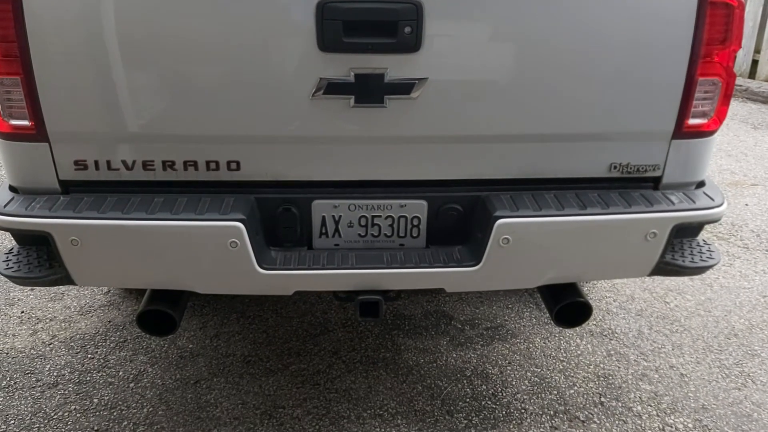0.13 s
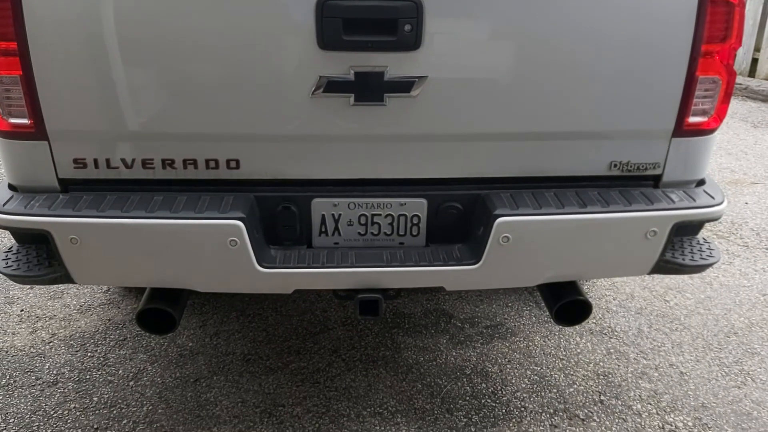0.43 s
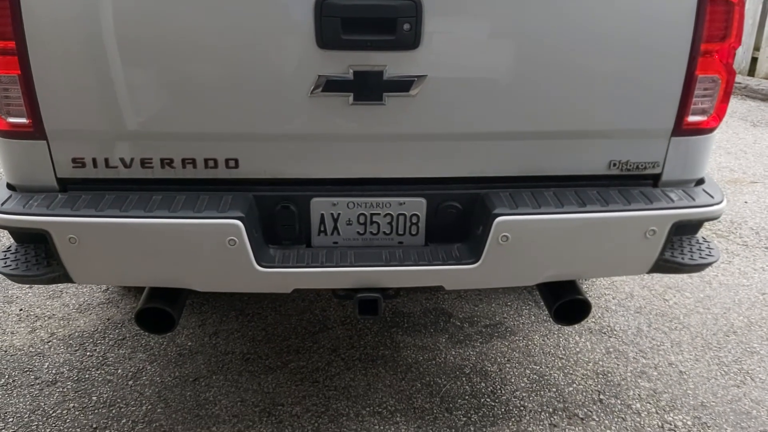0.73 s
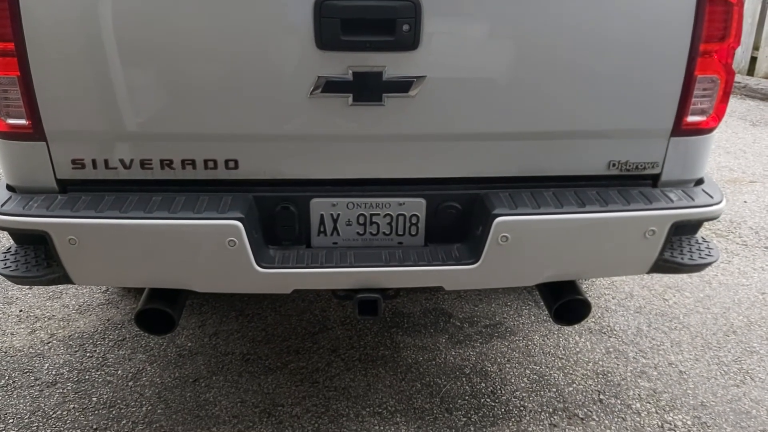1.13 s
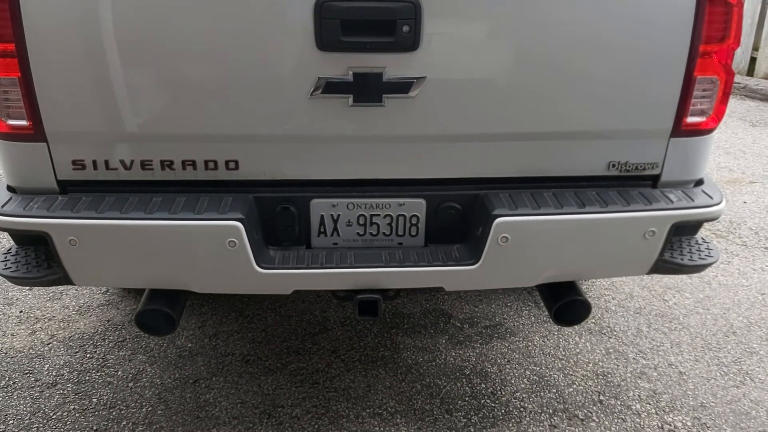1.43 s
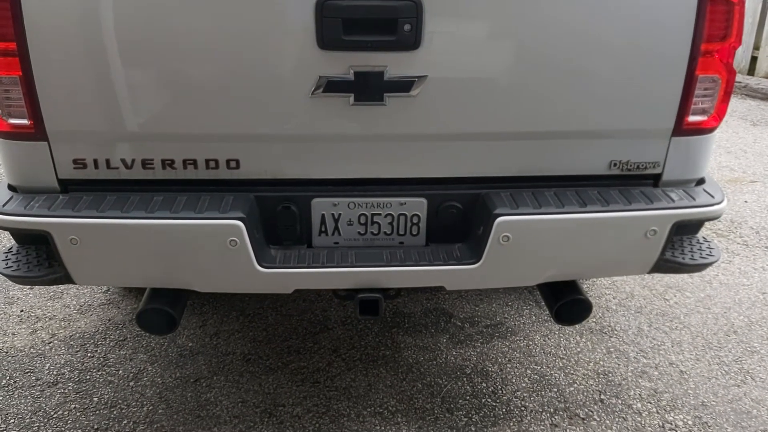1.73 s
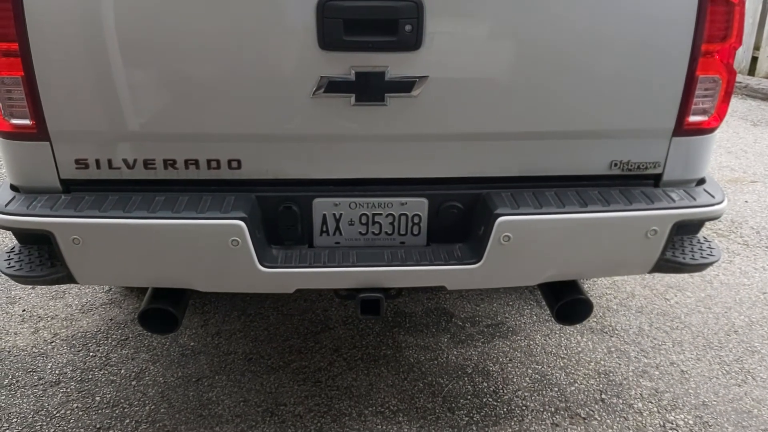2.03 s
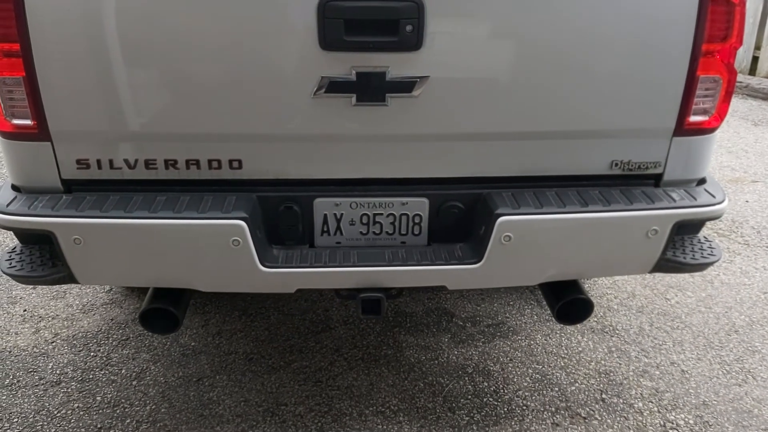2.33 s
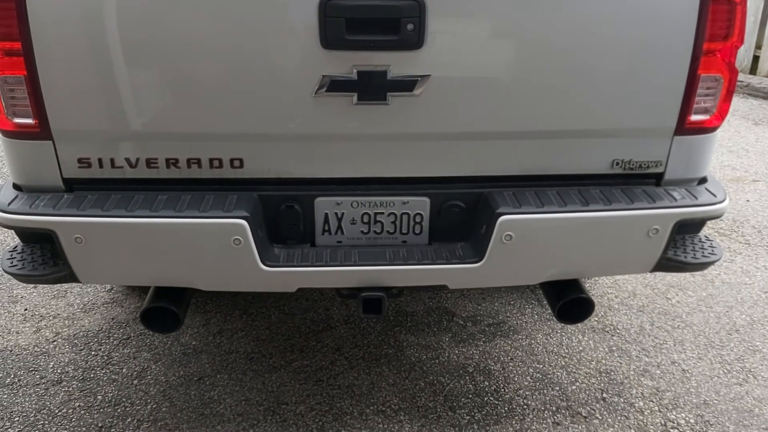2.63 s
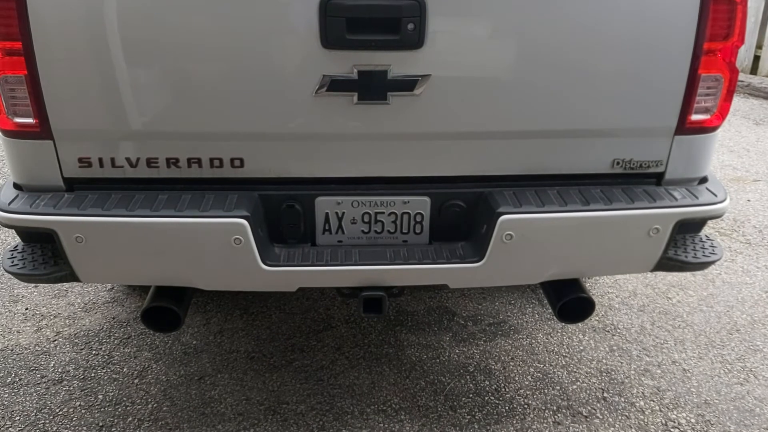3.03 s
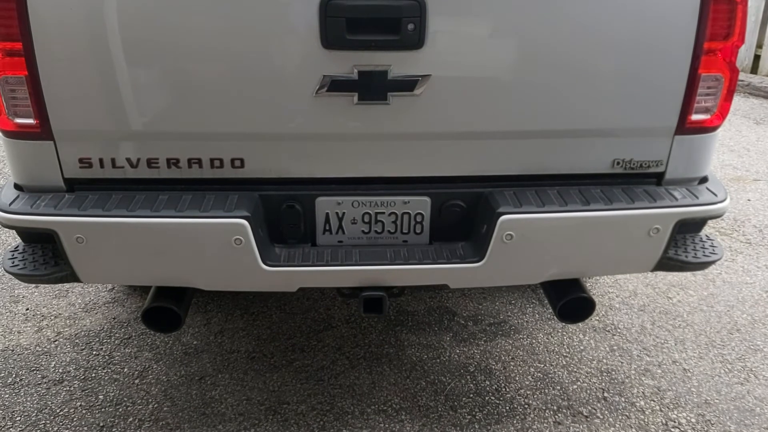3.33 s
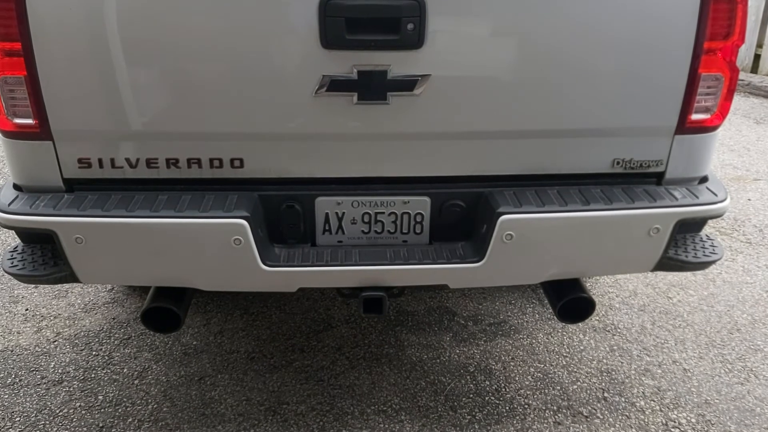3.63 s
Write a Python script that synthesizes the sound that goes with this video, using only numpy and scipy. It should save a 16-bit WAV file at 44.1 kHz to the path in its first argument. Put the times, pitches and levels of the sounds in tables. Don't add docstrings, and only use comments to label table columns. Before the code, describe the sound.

A V8 truck engine starts immediately: ragged thumping pops and bright cracks over 0-0.2 s, then a loud, booming exhaust flare peaking around 0.2-0.3 s. It drops away by 0.8 s, slowing into a much quieter, low burbling idle with soft rushing gas. Faint bird whistles come near 1.8-2 s and 3.2-3.5 s. The idle grows slightly fuller and lopes, with metallic tailpipe pings around 3.4-3.6 s and tiny dry rustles.

```python
import sys
import numpy as np
from scipy import signal
from scipy.fft import rfft, irfft, next_fast_len
from scipy.io import wavfile
from scipy.ndimage import uniform_filter1d

SR = 44100
rng = np.random.default_rng(int(sys.argv[2]) if len(sys.argv) > 2 else 0)


def invert_db(level):
    return 10 ** (np.asarray(level, dtype=float) / 20)


def output_pcm(signal):
    pcm = np.clip(np.atleast_2d(signal).T, -1, 1) * 32767
    wavfile.write(sys.argv[1], SR, np.round(pcm).astype(np.int16))


N = 166698

# f/Hz, width/Hz, level/dB
TAILPIPE_BANDS = [(390, 10, 5.5), (465, 68, 3.5), (668, 180, 8.5), (770, 37, 0.5), (1255, 190, 5),
                  (1466, 180, 0), (2092, 450, -4.5), (2640, 610, -13.5)]
BANKS = [1, -1, 1, -1, -1, 1, -1, 1]


def evened(x):
    return x / np.sqrt(np.mean(x ** 2) + 1e-20)


def read(points, hz):
    f, value = np.transpose(points)
    return np.interp(np.log(hz + 1), np.log(f + 1), value)


def ring(x, hz, width):
    r = np.exp(-np.pi * width / SR)
    return signal.lfilter([1 - r, 0, r - 1], [1, -2 * r * np.cos(2 * np.pi * hz / SR), r * r], x)


def clicks(times, sizes):
    return np.bincount(np.clip(np.round(times * SR).astype(int), 0, N - 1), sizes, N)


def decaying_tone(u, hz, width, rise_s):
    return np.minimum(u / rise_s, 1) * np.exp(-np.pi * width * u) * np.sin(2 * np.pi * hz * u)


def pops():
    # t/s, level/dB
    first_firings = [(.017, -9), (.029, -5), (.040, -6), (.053, -7), (.062, 0), (.070, -3), (.081, -6),
                     (.104, -1), (.120, -5), (.129, -3), (.140, -7), (.150, -8), (.162, -1), (.173, -4)]
    # f/Hz, width/Hz, level/dB
    pop_ring = [(70, 35, -1), (95, 35, 2), (125, 30, -4), (172, 35, -5), (255, 40, -3), (310, 30, -12)]
    soft_s = .002
    s, db = np.transpose(first_firings)
    train = clicks(s, -invert_db(db))
    thump = sum(invert_db(g) * ring(train, hz, w) / w for hz, w, g in pop_ring)
    thump = signal.fftconvolve(thump, np.hanning(round(2 * soft_s * SR)), "same")
    crack = sum(invert_db(g) * ring(train, hz, w) / np.sqrt(w) for hz, w, g in TAILPIPE_BANDS)

    def unit(v):
        return v / np.sqrt(np.mean(v[:SR // 5] ** 2))

    return invert_db(-8.5) * unit(thump) + invert_db(-38) * unit(crack), train


def raps(t):
    # t/s, level/dB, f/Hz
    cracks = [(0.017, -8, 680), (0.091, -9, 750), (0.118, -15.5, 584), (0.145, -4, 760), (0.21, -27.5, 587),
              (0.241, -13.5, 622), (0.281, -31, 650), (0.3, -30.5, 590), (0.321, -20, 623),
              (0.382, -16.5, 595), (0.401, -28, 627)]
    # multiple, level/dB
    crack_overtones = [(1, 0), (1.97, -1), (3.1, -9)]
    # t/s, level/dB, f/Hz
    upper_raps = [(0.2527, -27, 1280), (0.3036, -28, 1260), (0.411, -28.5, 1210), (0.4605, -33.5, 1460),
                  (0.644, -37, 1290), (0.679, -46, 1110), (0.6977, -46, 1280), (0.789, -36, 1160),
                  (2.4895, -42, 1200), (2.6193, -45, 1200), (2.7361, -31.5, 1260), (2.7897, -41, 1270),
                  (2.937, -34, 1270), (3.084, -31, 1270), (3.133, -41, 1290), (3.1798, -37, 1250),
                  (3.2565, -43, 1160), (3.404, -38, 1270), (3.4385, -18, 1280), (3.5258, -37, 1290),
                  (3.5574, -13, 1280), (3.6774, -39, 1290), (3.7248, -36, 1440), (3.7467, -34, 1290)]
    # t/s, level/dB, f/Hz
    pings = [(2.5875, -41, 2280), (2.6733, -43, 2110), (2.824, -48, 2030), (3.1397, -32.5, 2140),
             (3.1871, -26, 2050), (3.257, -38, 2030), (3.3737, -43, 2020), (3.4041, -29, 2090),
             (3.4964, -31, 2080), (3.7314, -35, 2050)]
    width_hz, rise_s, lean_db = 70, .002, -6
    rows = [(s, db - 4, hz) for table in (upper_raps, pings) for s, db, hz in table]
    rows += [(s, db - 3 + g, hz * m) for s, db, hz in cracks for m, g in crack_overtones]
    out = np.zeros(N)
    u = t[:SR // 20]
    for s, db, hz in rows:
        part = out[round(s * SR):][:len(u)]
        part += (invert_db(db) * decaying_tone(u, hz, width_hz, rise_s))[:len(part)]
    return np.array([out * invert_db(lean_db / 2), np.roll(out, 10) * invert_db(-lean_db / 2)])


def rush(shape, gate):
    # f/Hz, share
    likeness = [(300, 0.58), (640, 0.46), (1400, 0.42), (3100, 0.1), (6800, 0.14), (15000, 0.14)]
    # f/Hz, level/dB
    left_lean = [(380, 5.5), (700, -3.5), (1300, -6), (2400, -5), (4400, -3), (8000, -3.5), (15000, 3.5)]
    # f/Hz, phase/rad
    left_lead = [(20, 0), (520, .2), (780, -1), (1460, 1.3), (2070, -.2), (2400, .3), (15000, .3)]
    size = next_fast_len(N)
    hz = np.fft.rfftfreq(size, 1 / SR)
    a, b = rfft(rng.standard_normal((2, N)) * gate, size)
    same = np.clip(read(likeness, hz), 0, 1)
    lean = invert_db(read(left_lean, hz) / 2)
    shared = same * a * np.exp(-1j * read(left_lead, hz))
    right = (shared + np.sqrt(1 - same ** 2) * b) / lean
    return evened(irfft(np.array([a * lean, right]) * shape(hz), size)[:, :N])


def curve(points):
    return lambda hz: invert_db(read(points, hz))


def bands(modes):
    def shape(hz):
        return np.sqrt(sum(invert_db(g) ** 2 / (1 + (2 * (hz - f) / w) ** 2) ** 2 for f, w, g in modes))
    return shape


def gas(t, firings, gas_db):
    # f/Hz, level/dB per Hz
    under = [(180, -34), (300, 2), (464, -37), (540, -16.5), (700, -19.5), (1010, -30.5), (1280, -30),
             (5000, -59.5), (6500, -74), (11000, -120)]
    # f/Hz, level/dB per Hz
    hiss = [(1760, -42), (3000, 4.5), (3810, 1.5), (4410, 3), (5490, -4), (6340, 0), (6880, -12),
            (11300, -14.5), (15500, -17)]
    # f/Hz, level/dB per Hz
    blast_colour = [(530, -43), (900, -28), (1330, -8.5), (1790, -16.5), (2120, -13), (3330, -27),
                    (6040, -18.5), (7400, -32), (15500, -36)]
    # f/Hz, width/Hz, level/dB
    roar_bands = [(714, 240, 6), (1404, 87, 5), (1670, 140, -2.5), (2060, 1100, -14.5), (2760, 350, -11.5)]
    puff_s, floor = 0.0036, 4.2
    gate = floor + evened(signal.lfilter([1], [1, -np.exp(-1 / (puff_s * SR))], firings))
    steady = rush(bands(TAILPIPE_BANDS), gate)
    steady += invert_db(8.5) * rush(curve(under), gate)
    steady += invert_db(-16.5) * rush(curve(hiss), 9 + gate)
    blast = invert_db(-23.5 - 91 * t - 653 * np.maximum(t - 0.19, 0)) + invert_db(-63 - 39.5 * t)
    bright = blast * rush(curve(blast_colour), 11 + gate)
    roar = invert_db(-21 - 25.5 * t - 220 * np.maximum(t - .7, 0)) * np.minimum(t / 0.057, 1)
    return invert_db(gas_db) * steady + bright + roar * rush(bands(roar_bands), gate - 0.87 * floor)


def pipe(column, side):
    # f/Hz, width/Hz, both banks together/dB, their difference/dB, left-right/dB
    modes = [(44, 7, -45, -24, -3.5), (77, 9, -45, -23, .3), (105, 40, -45, -23, -.5),
             (137, 14, -22, -27, -2.5), (173, 13, -23, -19.5, -2.5), (222, 20, -44, -36, -1),
             (254, 18, -30, -23, -2), (275, 12, -32, -33, -1), (300, 14, -37, -37, 1),
             (334, 14, -44, -41, -1), (388, 14, -44, -38, -2), (458, 14, -48, -43, -3),
             (612, 30, -52, -50, -3), (710, 40, -54, -52, -3)]
    hz = np.fft.rfftfreq(2 ** 15, 1 / SR)
    power = 0
    for row in modes:
        gain = invert_db(row[column] + side * row[4] / 2)
        power = power + gain ** 2 / (1 + (2 * (hz - row[0]) / row[1]) ** 2) ** 2
    ceps = irfft(np.log(power + 1e-12) / 2)
    half = len(ceps) // 2
    ceps[1:half] *= 2
    ceps[half + 1:] = 0
    return irfft(np.exp(rfft(ceps)))[:half]


def firing_boom(turns, boom_db, wobble):
    # multiple, level/dB, lag/turns
    harmonics = [(1, 2, 0.14), (2, -4.5, 0.086), (3, -5, 0.15)]
    hum = 0
    for m, db, lag in harmonics:
        gain = invert_db(db + (m > 1) * (boom_db + 4.5))
        hum = hum + gain * np.cos(2 * np.pi * (m * turns - lag))
    boom = -np.sqrt(2) * invert_db(boom_db) * wobble * hum
    return boom + [[.12], [-.12]] * np.roll(boom, 110)


def exhaust(t, turns, boom_db, pulse_db, upper_db):
    k = np.arange(1, int(turns[-1]))
    luck = rng.standard_normal((400, 3))[:len(k)]
    s = np.interp(k, turns, t)
    uneven = .12 + .88 * np.clip((s - 1.95) / .4, 0, 1)
    place = k + 3
    angle = 2 * np.pi * (place / len(BANKS) + 0.31)
    pair = (-1.) ** k
    s = s + .00012 * luck[:, 0] + uneven * (.0003 * np.sin(angle) + .0007 * pair)
    odd = np.take(BANKS, place % len(BANKS)) + uneven * (0.043 * np.cos(angle) + .42 * pair)
    odd = odd + (1.3 - uneven) * .45 * np.sin(2 * angle) + .18 * luck[:, 1]

    trains = {2: clicks(s, -np.ones(len(k))), 3: clicks(s, -odd)}
    out = np.array([sum(signal.fftconvolve(v, pipe(c, side))[:N] for c, v in trains.items())
                    for side in (1, -1)])
    low = signal.sosfiltfilt(signal.butter(4, 215, fs=SR, output="sos"), out)
    out = low + invert_db(upper_db) * (out - low)
    level = np.sqrt(np.mean(pipe(3, 0.98) ** 2) * 2 ** 14 * 140 / SR)

    boom = firing_boom(turns, boom_db, 1 + .06 * np.interp(turns, k, luck[:, 2]))
    caught = np.clip((t - 0.12) / 0.26, 0, 1)
    puff_size = invert_db(4 * luck[:, 2]) * (1 + uneven * np.cos(angle + 2 * np.pi * 0.36))
    return caught * (invert_db(pulse_db) * out / level + boom), clicks(s, puff_size) * (caught > 0)


def headers(t, turns, pulse_db):
    # place/firings into the cycle, f/Hz, width/Hz, level/dB
    header_rings = [(4.1, 457, 15, 1), (4.6, 386, 12, -3), (6.1, 328, 18, -2), (3.8, 610, 26, -5),
                    (1.3, 605, 20, -11), (6.1, 715, 36, -5)]
    cycle = np.arange(1, int(turns[-1] / len(BANKS)) + 1)
    luck = rng.standard_normal((60, len(header_rings)))
    out = np.zeros(N)
    u = t[:SR // 5]
    for (place, hz, width, db), chance in zip(header_rings, luck.T):
        at = len(BANKS) * cycle + place
        sizes = invert_db(db + 1.2 * chance[cycle]) * (at < turns[-1])
        train = clicks(np.interp(at, turns, t), sizes)
        out += signal.fftconvolve(train, decaying_tone(u, hz, width, .01))[:N]
    settled = np.clip((t - 1.75) / .3, 0, 1)
    return out * invert_db(pulse_db - 11 + 6 * settled) * invert_db(np.array([[-1.2], [1.2]]))


def bird(t):
    # t/s, length/s, from f/Hz, to f/Hz, level/dB
    whistles = [(1.78, .015, 5000, 5500, -58.5), (1.799, .02, 4980, 5200, -60),
                (1.8, .015, 4160, 4150, -48), (1.819, .07, 5350, 5800, -64.5),
                (1.881, .012, 4160, 4700, -51), (1.887, .012, 5410, 5000, -58.5),
                (1.899, .012, 4660, 4150, -45.5), (1.956, .016, 4070, 5200, -51.5),
                (1.971, .016, 5900, 6200, -54.5), (1.978, .012, 5150, 5050, -57.5),
                (3.24, .05, 4030, 4500, -62.5), (3.525, .025, 3460, 3420, -52),
                (1.9, .06, 5530, 6200, -60.5), (3.277, .085, 4520, 6200, -54),
                (3.34, .025, 4200, 4500, -48.5)]
    out = np.zeros(N)
    for start, length, from_hz, to_hz, db in whistles:
        u = np.clip((t - start) / length, 0, 1)
        swell = np.sqrt(np.sin(np.pi * u).clip(0))
        phase = 2 * np.pi * np.cumsum(from_hz + (to_hz - from_hz) * u) / SR
        out += invert_db(db) * swell * np.sin(phase)
    out *= invert_db(-4) + .45 * evened(uniform_filter1d(rng.standard_normal(N), 90))
    yard = rng.standard_normal(SR // 4) * invert_db(-60 * t[:SR // 4] / .16)
    return out + invert_db(2) * signal.fftconvolve(out, yard / np.linalg.norm(yard))[:N]


def rustle(t):
    # t/s, length/s, level/dB
    swells = [
        (3.13, .1, -73),
        (3.158, .006, -63),
        (3.774, .012, -50),
    ]
    highpass = signal.butter(4, 6500, "high", fs=SR, output="sos")
    hiss = signal.sosfilt(highpass, rng.standard_normal(N))
    return hiss * sum(invert_db(db) * np.sin(np.pi * np.clip((t - s) / length, 0, 1))
                      for s, length, db in swells)


def metal_ticks(t):
    # t/s, f/Hz, level/dB
    ticks = [
        (3.235, 3900, -58),
    ]
    out = np.zeros(N)
    for s, hz, db in ticks:
        u = np.maximum(t - s, 0)
        tone = invert_db(db - 2500 * u) * (t > s) * np.sin(2 * np.pi * hz * u)
        out += tone * (1 + .6 * rng.standard_normal(N))
    return out


def off_to_the_side(x):
    return np.array([x * invert_db(-1.2) + .3 * np.roll(x, 310), np.roll(x, 25) * invert_db(1.3)])


def scene():
    # t/s, boom/dB, pulse level/dB, gas level/dB, upper pipe modes/dB
    course = [(0, 14, -16, -44.5, 0), (.02, 0.5, -18.5, -24.5, -14), (.2, -2.5, 4, -30.5, -8),
              (0.298, -8, -13.5, -36, 6.5), (.56, -10, -18.5, -38.5, -2), (.68, -11.5, -16, -41, -3.5),
              (.76, -23, -13, -39.5, -3.5), (.92, -22.5, -20, -42, 3), (1.1, -30.5, -16.5, -44, 1),
              (1.4, -26.5, -21.5, -45.5, 7.5), (1.64, -22.5, -18, -46, 5), (1.78, -19.5, -18.5, -46, -8.5),
              (2.001, -24.5, -19, -44.5, -5.5), (2.3, -17.5, -17, -40.5, 0.5), (2.77, -18.5, -14.5, -38, 2),
              (3.25, -22, -11.5, -37, 0), (3.78, -15.5, -12.5, -36, -0.5)]
    # t/s, firings per second/Hz
    speed = [(0, 86), (.15, 92), (.25, 99.9), (.45, 100.3), (.55, 99.2), (.65, 95.6), (.76, 91),
             (1.05, 87.6), (1.32, 84.3), (1.5, 80), (1.85, 74.9), (2.35, 70.3), (2.85, 68.7), (3.35, 68),
             (3.78, 66.4)]
    t = np.arange(N) / SR
    s, *cols = np.transpose(course)
    boom_db, pulse_db, gas_db, upper_db = (np.interp(t, s, c) for c in cols)
    turns = np.cumsum(np.interp(t, *np.transpose(speed))) / SR
    thump, train = pops()
    note, firings = exhaust(t, turns - .36, boom_db, pulse_db, upper_db)
    engine = note + thump * invert_db(0) * invert_db(np.array([[-1], [1]]))
    engine = engine + gas(t, firings - 0.29 * train, gas_db)
    engine = engine + headers(t, turns, pulse_db) + raps(t)
    return engine + off_to_the_side(bird(t) + rustle(t) + metal_ticks(t))


def top_cut(x):
    return signal.sosfilt(signal.butter(12, 15620, fs=SR, output="sos"), x)


def record(dry):
    cut = signal.sosfilt(signal.butter(4, 37, "high", fs=SR, output="sos"), dry)
    mix = 1.189 * np.tanh(cut / 1.606)
    return top_cut(mix)


dry = scene()
out = record(dry)
output_pcm(out)
```